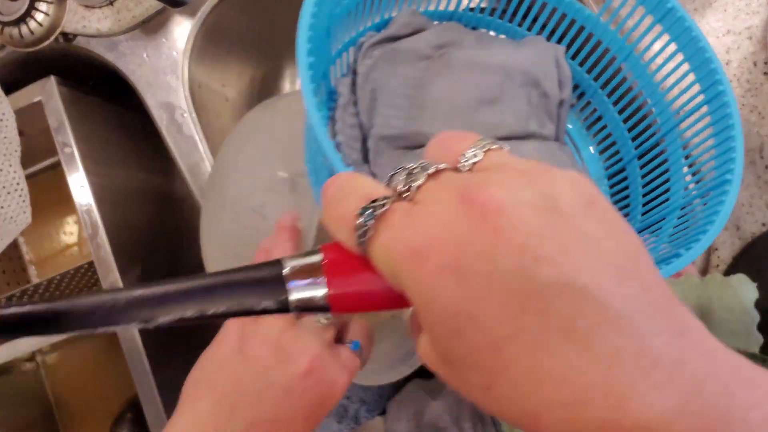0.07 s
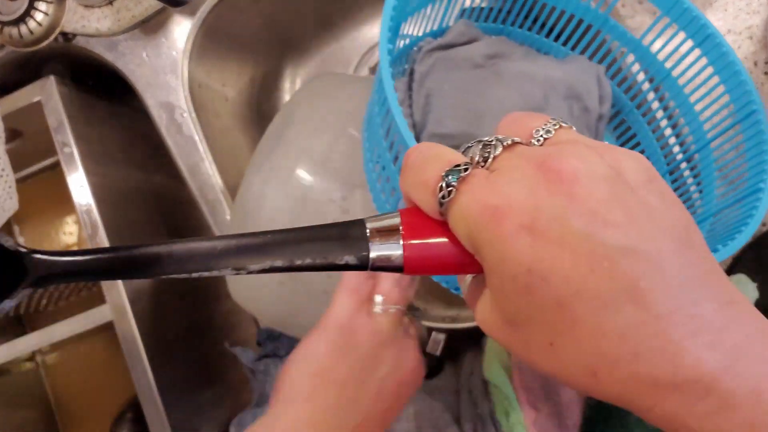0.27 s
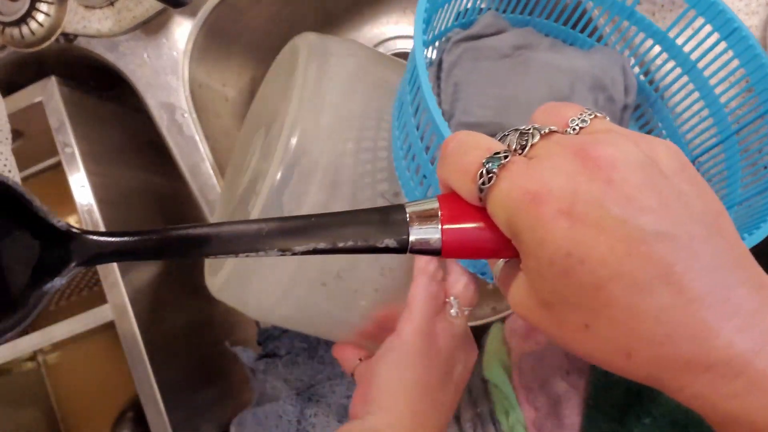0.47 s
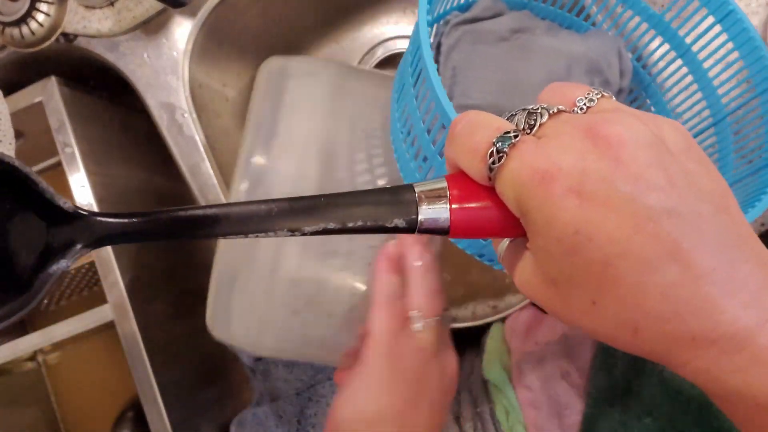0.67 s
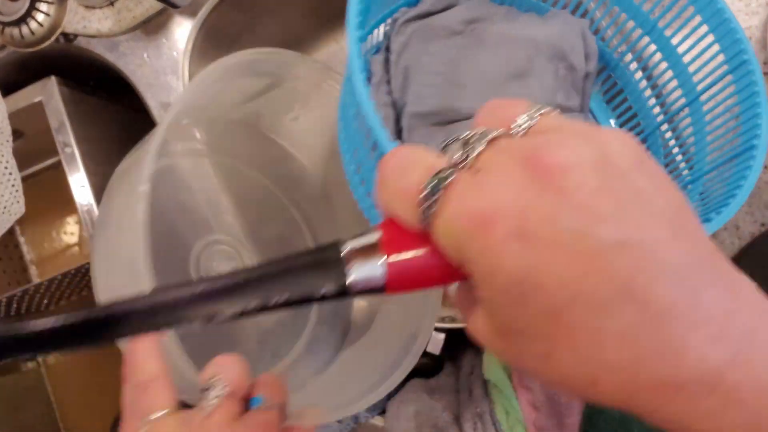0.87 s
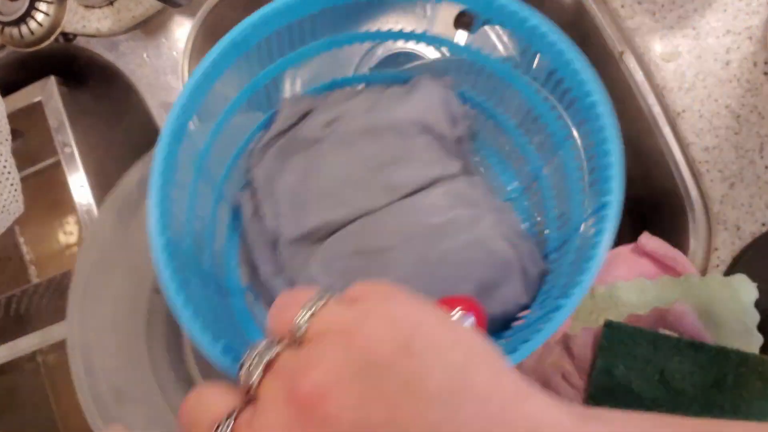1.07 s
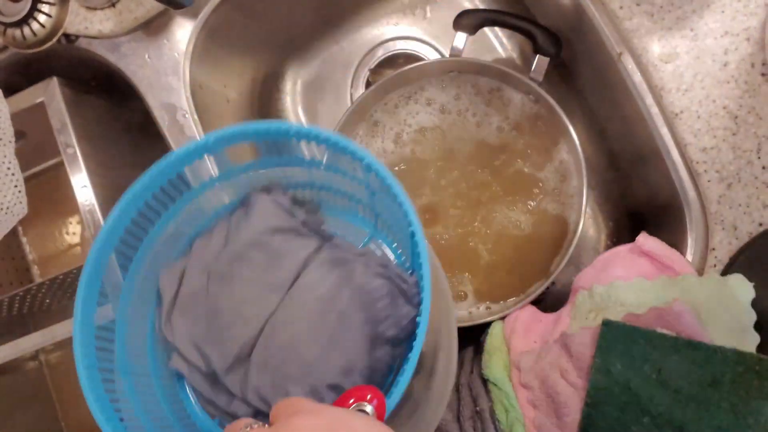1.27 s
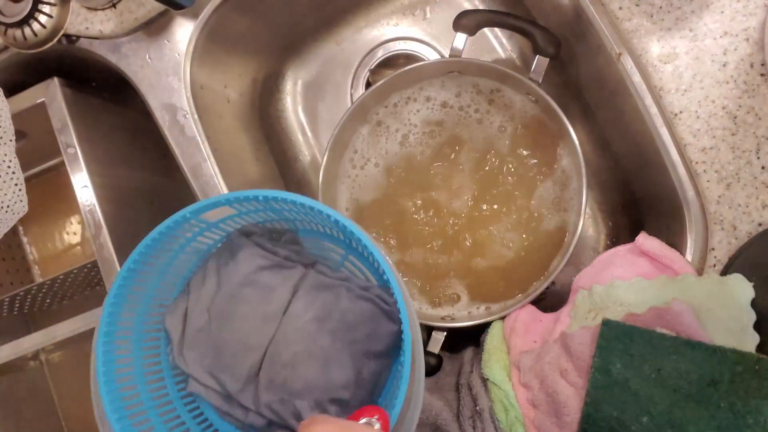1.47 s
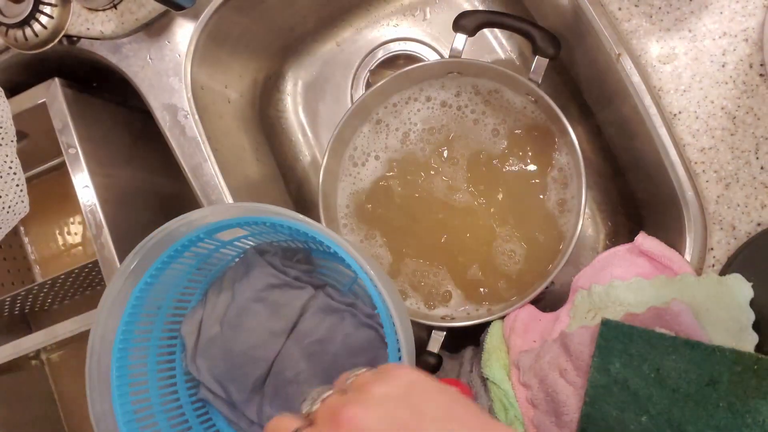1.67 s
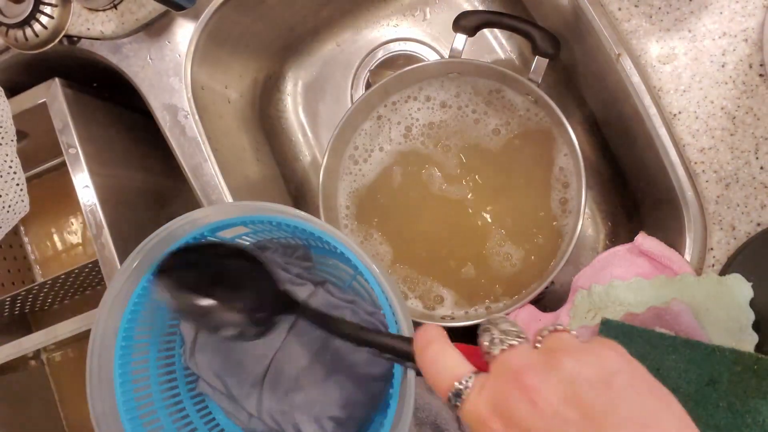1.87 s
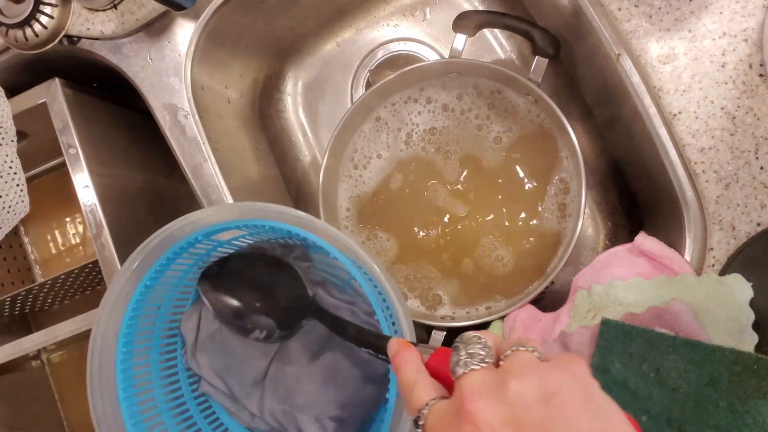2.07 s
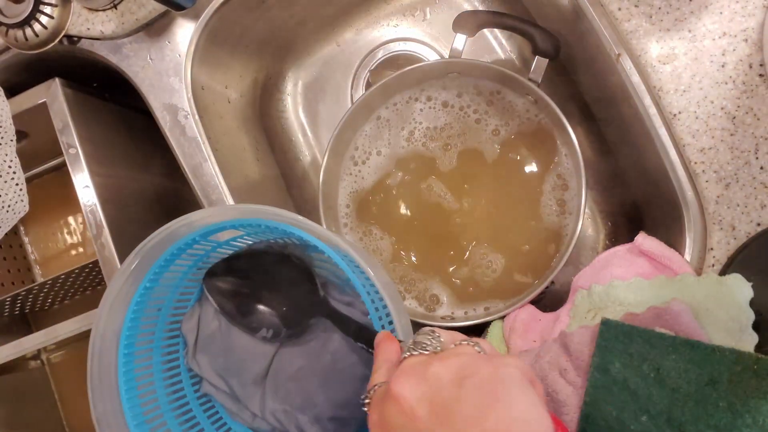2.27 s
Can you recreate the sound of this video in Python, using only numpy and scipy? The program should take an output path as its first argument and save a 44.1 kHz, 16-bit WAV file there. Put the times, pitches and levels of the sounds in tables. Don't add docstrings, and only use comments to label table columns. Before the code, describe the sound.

Plastic clatter, close in a quiet kitchen. From 0 to 0.7 s, faint knocks, ticks, wet rubbing and little drips as a bowl is turned. A low, steel-sink thud at 0.75-0.8 s, then near quiet. At 1.2-1.4 s a basket bangs into the hollow bowl, loud, sharp and slightly distorted. Damped knocks settle until 1.8 s; light ladle taps near 1.9-2.2 s over faint water sizzle.

```python
import sys
import numpy as np
from scipy import signal
from scipy.fft import rfft, irfft, next_fast_len
from scipy.io import wavfile
from scipy.ndimage import uniform_filter1d

SR = 44100
rng = np.random.default_rng(int(sys.argv[2]) if len(sys.argv) > 2 else 0)


def generate_wav(signal):
    frames = np.transpose(np.atleast_2d(signal))
    scaled = np.clip(frames, -1, 1) * 32767
    pcm = np.round(scaled).astype(np.int16)
    wavfile.write(sys.argv[1], SR, pcm)


def magnitude_from_level(level_db):
    exponent = np.asarray(level_db, float) / 20
    return 10 ** exponent


N = 101738

# frequency in Hz, level in dB, T60 in s.
SINK_MODES = [(62.9, -13.5, 1), (89.2, -20, 0.71), (108.88, 4, 0.79), (120.3, -1.5, 0.66),
              (163.1, 4.5, 0.48), (209.2, -3.5, 0.4), (230.76, -0.5, 0.61)]
# frequency in Hz, level in dB, T60 in s.
BOWL_MODES = [(274.5, 12.5, 0.05), (307, -14.5, 0.47), (376.2, 7, 0.15), (399, -6, 0.22), (511, -1.5, 0.12),
              (530.6, -7.5, 0.19), (683, -24, 0.23)]
# frequency in Hz, level in dB.
CLACK_SPECTRUM = [(500, -57), (900, 7.5), (1300, 16.5), (2200, 13), (3600, 3.5), (6000, -48)]
# frequency in Hz, level in dB.
RASP_SPECTRUM = [(1470, -126), (2500, -2.5), (4340, 0.5), (5730, -5), (11200, -5.5), (15000, -14),
                 (16500, -4)]
SEATED_S = 1.45


def evened(x):
    return x / np.sqrt(np.mean(x ** 2) + 1e-20)


def smooth_noise(length, size):
    return evened(uniform_filter1d(rng.standard_normal(length), size=size))


def read(points, hz):
    f, value = np.transpose(points)
    return np.interp(np.log(hz + 1), np.log(f + 1), value)


def add(mix, s, sound):
    part = mix[..., max(round(s * SR), 0):][..., :sound.shape[-1]]
    part += sound[..., :part.shape[-1]]


def colour(x, points):
    size = next_fast_len(x.shape[-1])
    gain = magnitude_from_level(read(points, np.fft.rfftfreq(size, 1 / SR)))
    return irfft(rfft(x, size) * gain, size)[..., :x.shape[-1]]


def resonate(x, hz, width):
    turn = np.exp(2j * np.pi * hz * np.arange(x.shape[-1]) / SR)
    r = np.exp(-np.pi * width / SR)
    return 2 * (turn * signal.lfilter([1 - r], [1, -r], x / turn)).real


def crackle():
    grains_per_s, grain_db = 600, 5
    size = magnitude_from_level(grain_db * np.minimum(rng.exponential(1, N), 3.6))
    size = size * (rng.random(N) < grains_per_s / SR)
    kind = rng.integers(0, 24, N)
    t = np.arange(900) / SR
    out = np.zeros(N)
    for k, hz in enumerate(np.geomspace(450, 14000, 24)):
        grain = np.sqrt(hz) * np.exp(-t * hz / 6) * np.sin(2 * np.pi * hz * t)
        out += signal.oaconvolve(size * (kind == k), grain)[:N]
    return evened(colour(out, [(400, 31.5), (14000, -42.0)]))


def shaken(noise, modes, damping):
    return evened(sum(magnitude_from_level(db) * evened(resonate(noise, hz, damping / t60)) for hz, db, t60 in modes))


def handling():
    # time in seconds, rubbing in dB, shaking in dB.
    strength = [(0, -71, -40), (.1, -81, -48), (0.198, -55.5, -38.5), (0.268, -52.5, -52), (.42, -40, -35),
                (.5, -42.5, -39), (0.619, -46.5, -53), (0.743, -39, -35), (0.757, -27, -46),
                (0.803, -34.5, -34.5), (.9, -87, -43.5), (1.092, -67.5, -54.5), (1.17, -41, -55),
                (1.3, -31, -33), (1.45, -46, -38.5), (1.621, -37, -36), (1.781, -48.5, -38.5),
                (2.1, -59.5, -54)]
    # frequency in Hz, level in dB.
    rub_spectrum = [(290, -143), (500, -38), (764, -43), (885, -36.5), (1950, -21), (7270, -39.5),
                    (11800, -39.5), (15800, -43), (16500, -52)]
    s, rub_db, shake_db = np.transpose(strength)
    t = np.arange(N) / SR
    grains, hiss, noise = crackle(), rng.standard_normal(N), rng.standard_normal(N)
    patchy = magnitude_from_level(4 * evened(uniform_filter1d(noise, size=260)))
    rub = evened(colour(4 * grains + evened(patchy * hiss), rub_spectrum))
    sink = shaken(noise, SINK_MODES, 9)
    bowl = shaken(noise, BOWL_MODES, 4)
    bowl_db = -20 + 5 * (t > SEATED_S)
    shake = sink + magnitude_from_level(bowl_db) * bowl
    return magnitude_from_level(np.interp(t, s, rub_db)) * rub + magnitude_from_level(np.interp(t, s, shake_db)) * shake


def kitchen():
    # frequency in Hz, level in dB.
    room_spectrum = [(15, -51), (25, 21), (483, -4), (553, -18), (1030, -76), (1600, -5.5), (2210, -26),
                     (14800, -71), (16500, -37)]
    # centre in Hz, bandwidth in Hz, level in dB.
    sizzle_bands = [(1590, 130, 0), (4320, 80, -14)]
    room_db, sizzle_db, sizzle_from_s = -57, -61, 1.95
    drain, air = rng.standard_normal((2, N))
    sizzle = evened(sum(magnitude_from_level(db) * resonate(resonate(drain, hz, w), hz, w) for hz, w, db in sizzle_bands))
    fade_in = np.clip((np.arange(N) / SR - sizzle_from_s) / 0.055, 0, 1)
    return magnitude_from_level(room_db) * evened(colour(air, room_spectrum)) + magnitude_from_level(sizzle_db) * sizzle * fade_in


def ring(modes, t, spot_db):
    hz, db, t60 = np.transpose(modes)[:, :, None]
    luck = rng.standard_normal((14, 2))[:len(modes)]
    waver = .7 * luck[::-1, :1] * np.sin(2 * np.pi * (13 + 2 * luck[0, 1]) * t)
    level = magnitude_from_level(db + spot_db * luck[:, :1] - 60 * t / t60)
    detuned_hz = hz * (1 + 0.011 * luck[:, 1:])
    x = (level * np.sin(2 * np.pi * detuned_hz * t + waver)).sum(0)
    return x / abs(x).max()


def burst(t, points, t60):
    tail_t60 = 0.21
    noise = evened(colour(rng.standard_normal(len(t)), points))
    ragged = magnitude_from_level(3.5 * smooth_noise(len(t), 130))
    snap_level = magnitude_from_level(6 - 60 * t / .008)
    crack = ragged * magnitude_from_level(-60 * t / t60)
    tail = np.sqrt(ragged) * magnitude_from_level(-7 - 60 * t / tail_t60)
    return noise * (snap_level + crack + tail) * np.minimum(t / 0.0018, 1)


def knock(s, clack_db, sink_db, bowl_db, rasp_db):
    # frequency in Hz, level in dB, T60 in s.
    rim_modes = [(1130, -13.5, 0.15), (1230, 6, 0.036), (1490, -9.5, 0.043), (1712, -11, 0.024),
                 (1826, 9.5, 0.02), (1994, 2.5, 0.044), (2347, -16.5, 0.017), (2825, 2, 0.023),
                 (3450, 0.5, .02)]
    spot_db = 3.5
    thud_hz, thud_t60, thud_db = 264, 0.0087, 6
    t = np.arange(0, .8, 1 / SR)
    thud = magnitude_from_level(thud_db - 60 * t / thud_t60) * np.sin(2 * np.pi * thud_hz * t)
    bowl = magnitude_from_level(-9.5 * (s > SEATED_S)) * ring(BOWL_MODES, t, spot_db) + thud
    low = magnitude_from_level(sink_db + 5.0) * ring(SINK_MODES, t, 0.75 * spot_db) + magnitude_from_level(bowl_db + 6.5) * bowl
    clack = ring(rim_modes, t, spot_db) + magnitude_from_level(-14) * burst(t, CLACK_SPECTRUM, 0.026)
    rasp = burst(t, RASP_SPECTRUM, 0.058)
    return s, low * np.minimum(t / 0.0026, 1) + magnitude_from_level(clack_db) * clack + magnitude_from_level(rasp_db - 1.5) * rasp


def spot(s, hz, db, t60):
    t = np.arange(0, .42, 1 / SR)
    waver = .4 * smooth_noise(len(t), 400) * np.minimum(t / .01, 1)
    return s, magnitude_from_level(db - 60 * t / t60) * np.sin(2 * np.pi * hz * t + waver)


def snap(s, hz, db, t60):
    width = 0.16 * hz
    t = np.arange(0, .15, 1 / SR)
    noise = rng.standard_normal(len(t))
    band = evened(resonate(resonate(noise, hz, width), hz, width))
    return s, band * magnitude_from_level(db - 60 * t / t60) * np.minimum(t / 0.00079, 1)


def tick(s, clack_db, rasp_db, length):
    t = np.arange(0, .4, 1 / SR)
    clack = burst(t, CLACK_SPECTRUM, length)
    rasp = burst(t, RASP_SPECTRUM, length)
    return s, magnitude_from_level(clack_db - 28.5) * clack + magnitude_from_level(rasp_db + 4.5) * rasp


def drip(s, hz, db, length):
    t = np.arange(0, 3 * length, 1 / SR)
    u = t / length
    waver = .35 * smooth_noise(SR // 2, 500)[:len(t)]
    level = magnitude_from_level(db) * np.minimum(u / 0.47, 1) * np.exp(-2.5 * u ** 2)
    return s, level * np.sin(2 * np.pi * hz * t * (1 + 0.0046 * u) + waver)


def ports(x):
    # frequency in Hz, level in dB.
    side_spectrum = [(60, -17), (300, -24), (600, -9), (1650, -3), (5000, 1)]
    left_db = -3.5
    taps = rng.standard_normal((3, 1300)) * magnitude_from_level(-60 * np.arange(1300) / SR / .03)
    taps = taps / np.linalg.norm(taps, axis=1, keepdims=True)
    turn = np.cos(2 * np.pi * (6.3 * np.arange(N) / SR + np.arange(3)[:, None] / 3)) * np.sqrt(2 / 3)
    side = signal.oaconvolve(x * turn, taps, axes=1)[:, :N].sum(0)
    side = colour(side, side_spectrum)
    return np.array([x + side, x - side]) * magnitude_from_level(left_db / 2 * np.array([[1], [-1]]))


def scene():
    # start in seconds, then clack, sink, bowl and rasp levels in dB.
    knocks = [(0.0, -43, -19.5, -29, -40.5), (0.155, -27.5, -25, -28.5, -43), (0.307, -32, -56, -23.5, -59),
              (0.322, -37, -41, -26, -40), (0.447, -25, -65, -38.5, -35.5),
              (0.749, -16.5, -18.5, -18, -37.5), (0.79, -19.5, -15.5, -23, -59),
              (0.805, -20, -19, -66, -66), (1.106, -24, -31, -22, -42), (1.212, -8.5, -9, 6, -31.5),
              (1.264, -10, -12.5, -1.5, -33.5), (1.277, -11, -18.5, -2, -38),
              (1.327, -0.5, -15, 0.5, -21.5), (1.37, -0.5, -13.5, -1, -18.5), (1.387, -3, -16.5, -3.5, -29),
              (1.548, -15.5, -64, -9.5, -46), (1.5965, -24, -31, -5, -39), (1.681, -18, -71, -7.5, -44.5),
              (1.786, -24, -56, -12.5, -52), (1.802, -20, -26.5, -16.5, -37),
              (1.931, -24.5, -45.5, -21.5, -50), (2.032, -27.5, -41, -33.5, -54)]
    # start in seconds, pitch in Hz, level in dB, T60 in s.
    spots = [(0, 242, -24.5, 0.52), (.156, 577, -40, 0.28), (.31, 380, -44, 0.2), (.7885, 178, -4.5, 0.047),
             (1.371, 322.4, -4, 0.11), (1.388, 493.4, -5.5, 0.1), (1.5965, 191, -9, 0.053),
             (1.6825, 220, -14.5, 0.097), (1.931, 1263, -20.5, 0.017), (1.931, 2216, -26, 0.026),
             (2.033, 254, -25.5, 0.052)]
    # start in seconds,
    # pitch in Hz, level in dB, T60 in s.
    pings = [(0.014, 1192, -42, 0.13), (.153, 2950, -38, 0.044), (.175, 1900, -40.5, 0.11),
             (.286, 1930, -33.5, .04), (0.284, 3070, -39, 0.035), (.322, 1400, -30, 0.038),
             (0.309, 228.2, -26, 0.62), (0.788, 1248, -26, .12), (1.108, 59, -22.5, 0.25),
             (1.105, 1726, -33.5, 0.11), (1.105, 2230, -31.5, 0.072), (1.161, 1910, -36, 0.13),
             (1.212, 1145, -10, .11), (1.215, 1712, -29, 0.14), (1.212, 258.6, -7, 0.1),
             (1.264, 1198, -14.5, .13), (1.263, 1567, -16.5, 0.072), (1.263, 2430, -19, 0.049),
             (1.328, 2010, -16, .07), (1.328, 1320, -40, 0.044), (1.33, 2770, -19, 0.065),
             (1.371, 1980, -12.5, 0.043), (1.389, 1860, -21, 0.02), (1.388, 613, -21, 0.13),
             (1.401, 114, -18.5, 1), (1.493, 1910, -35, 0.028), (1.595, 1264, -20, 0.03),
             (1.595, 1994, -30, 0.087), (1.682, 1230, -22, 0.029), (1.786, 1233, -26.5, 0.034),
             (1.39, 307, -16, 0.357), (1.803, 1060, -35, 0.065)]
    # start in seconds, centre in Hz, level in dB, T60 in s.
    snaps = [(.004, 6930, -35.5, .03), (.01, 3980, -38, .03), (.08, 3600, -46.5, 0.068),
             (.242, 2960, -46, 0.046), (.367, 4200, -43.5, 0.037), (.748, 5940, -49, 0.027),
             (1.327, 12800, -16, 0.013), (1.37, 10500, -17, 0.016), (1.387, 12900, -14.5, 0.018),
             (1.548, 5600, -30, 0.012), (1.681, 4950, -33.5, 0.012), (1.803, 5950, -35.5, 0.014),
             (1.931, 6200, -41, 0.032), (2.135, 5750, -52, 0.027), (2.168, 9700, -45, 0.024),
             (2.176, 12000, -48, 0.059)]
    # start in seconds, clack level in dB, rasp level in dB, length in s.
    ticks = [(0.0074, -32, -38, 0.0079), (0.067, -23, -47, 0.008), (0.2833, -14, -52.5, 0.18),
             (0.364, -19, -52, 0.03), (0.4355, -13, -40, 0.026), (0.466, -27, -39.5, 0.0058),
             (0.5795, -11, -39.5, 0.015), (0.656, -14, -44, 0.0073), (0.9183, -25.5, -57, 0.066),
             (0.9614, -60, -54.5, 0.019), (1.007, -62, -55.5, 0.014), (1.066, -61, -47, 0.012),
             (1.1594, -11.5, -57, 0.039), (1.493, -12.5, -84, 0.06), (1.591, -9, -36.5, 0.064),
             (1.698, -26, -48.5, 0.12), (2.168, -22.5, -62, 0.18)]
    # start in seconds, pitch in Hz, level in dB, length in s.
    drips = [(.404, 856, -22, 0.009), (.412, 694, -22.5, 0.011), (.447, 4100, -29, 0.0083),
             (.455, 2400, -30, 0.025), (.523, 840, -25, 0.0095), (.657, 1224, -25.5, 0.025),
             (.921, 2740, -38.5, 0.0093), (1.172, 1170, -46, 0.013), (1.281, 2710, -22.5, 0.019),
             (.176, 4000, -42, 0.0089), (.342, 1860, -37, 0.014), (.455, 438, -23.5, 0.0096),
             (.49, 580, -25.5, 0.0047), (.618, 1240, -38, 0.014), (.62, 2700, -38, 0.0072),
             (.657, 2940, -35.5, 0.016), (.685, 762, -28.5, 0.02), (.708, 307, -24, 0.011),
             (1.046, 2750, -44, 0.0082)]
    mix = handling() + kitchen()
    events = ((knocks, knock), (spots, spot), (pings, spot), (snaps, snap), (ticks, tick), (drips, drip))
    for rows, source in events:
        for row in rows:
            add(mix, *source(*row))
    return ports(mix)


def band_limit(x):
    return signal.sosfilt(signal.butter(12, 16700, fs=SR, output="sos"), x)


def record(dry):
    low_hz, edge_hz, limit = 44.8, 15700, .99
    wet = signal.lfilter(*signal.butter(2, low_hz, "high", fs=SR), dry)
    wet = colour(wet, [(edge_hz, 0), (edge_hz + 500, -30)])
    return band_limit(np.clip(wet, -limit, limit))


dry = scene()
out = record(dry)
generate_wav(out)
```